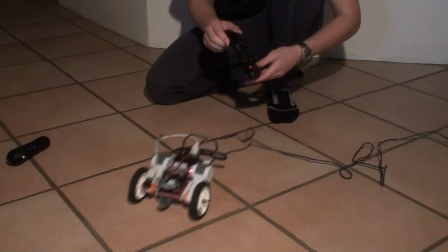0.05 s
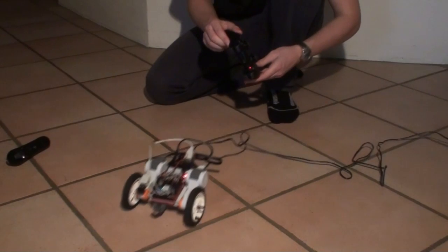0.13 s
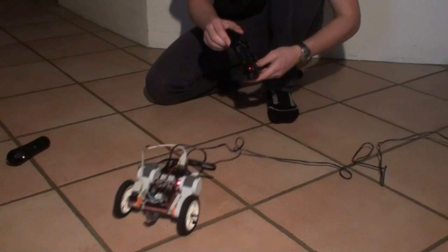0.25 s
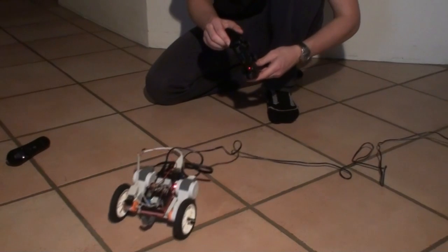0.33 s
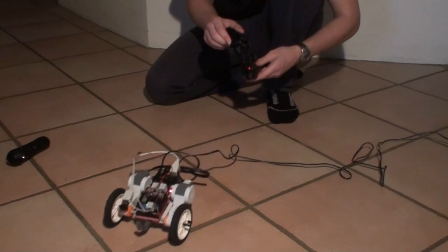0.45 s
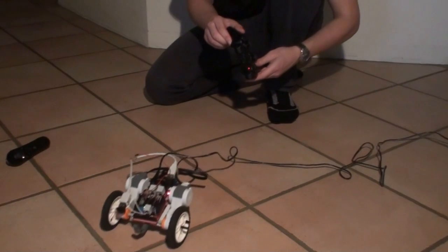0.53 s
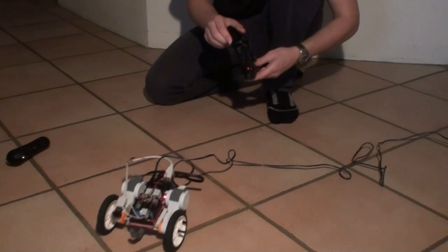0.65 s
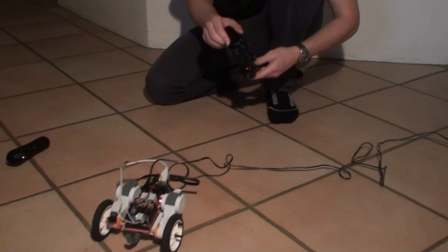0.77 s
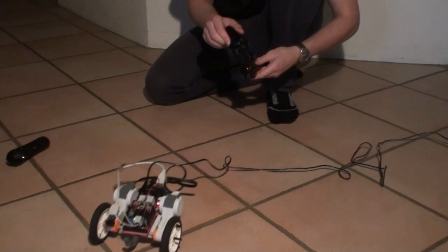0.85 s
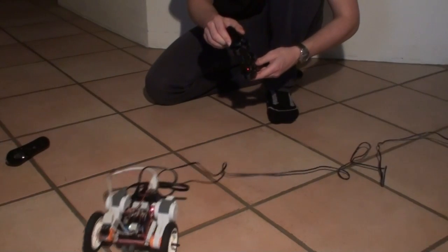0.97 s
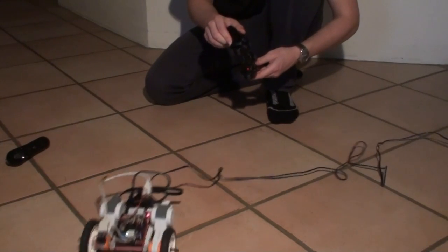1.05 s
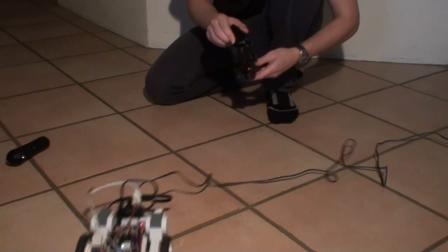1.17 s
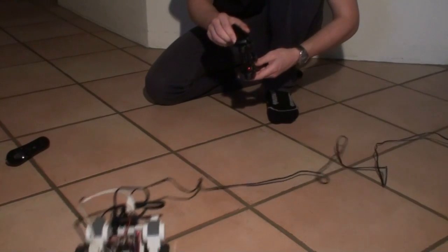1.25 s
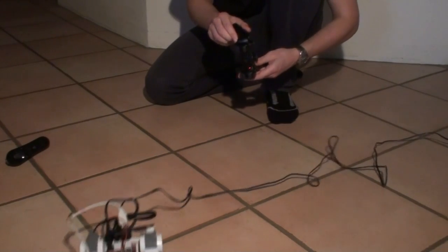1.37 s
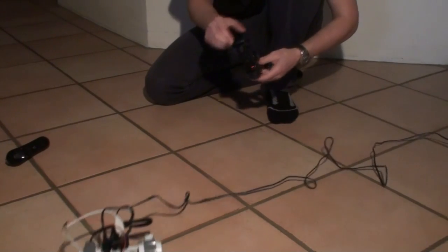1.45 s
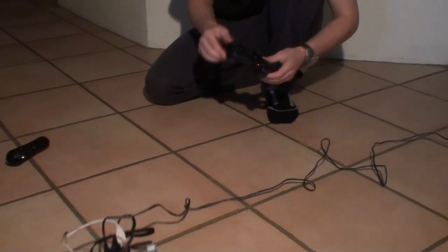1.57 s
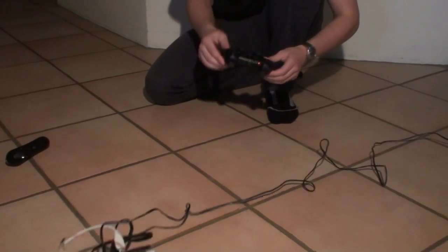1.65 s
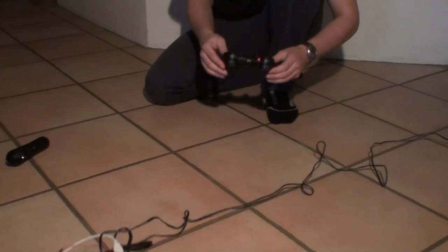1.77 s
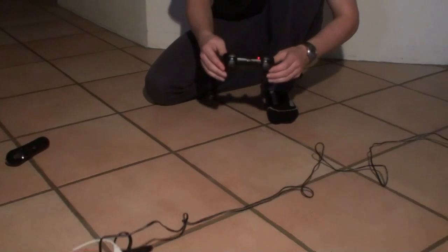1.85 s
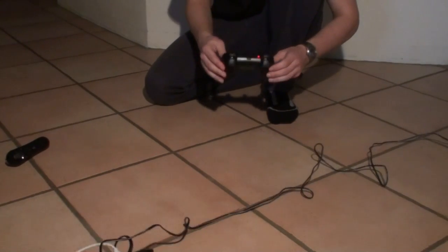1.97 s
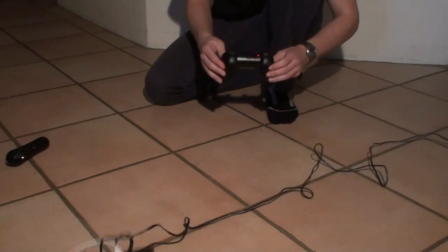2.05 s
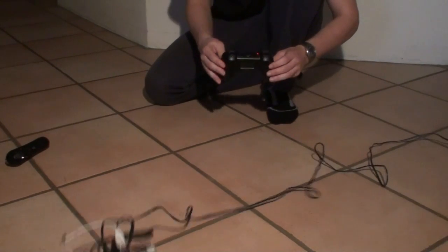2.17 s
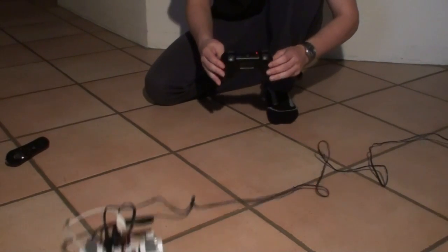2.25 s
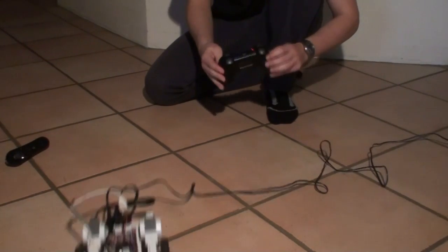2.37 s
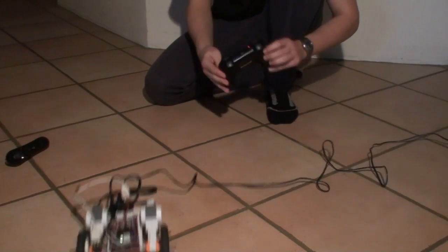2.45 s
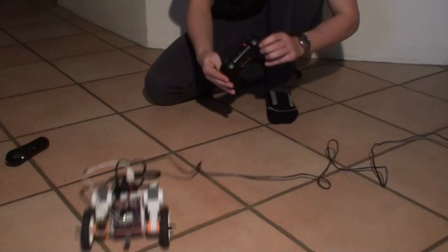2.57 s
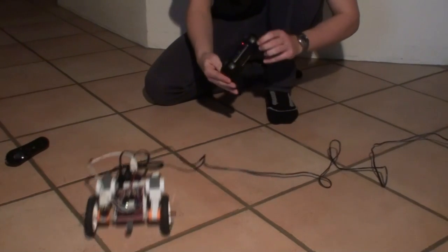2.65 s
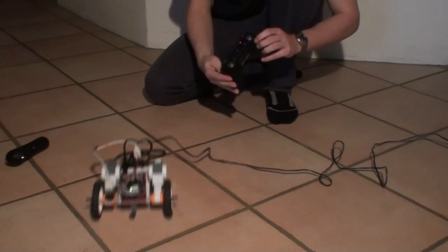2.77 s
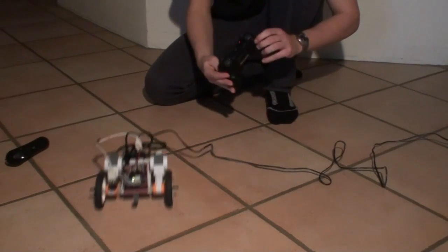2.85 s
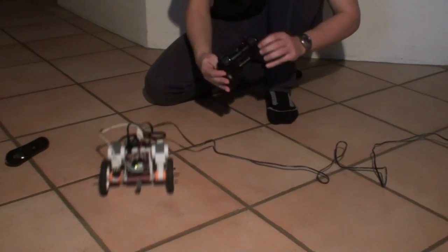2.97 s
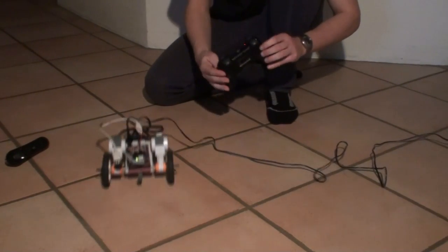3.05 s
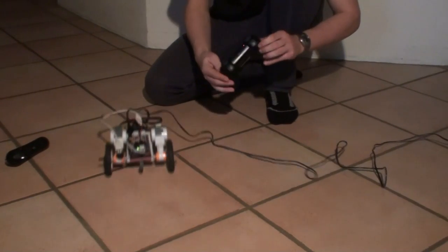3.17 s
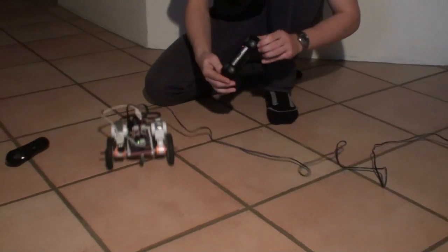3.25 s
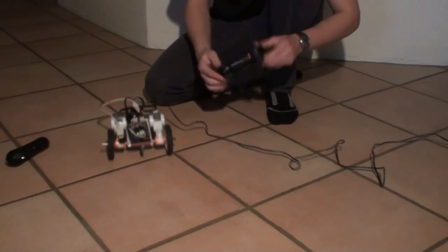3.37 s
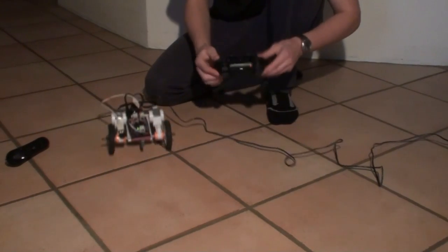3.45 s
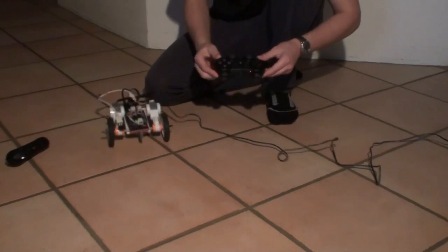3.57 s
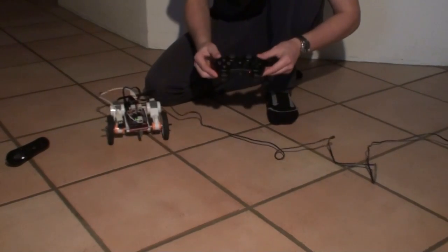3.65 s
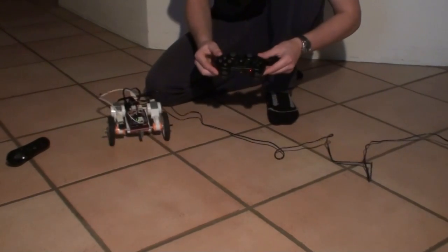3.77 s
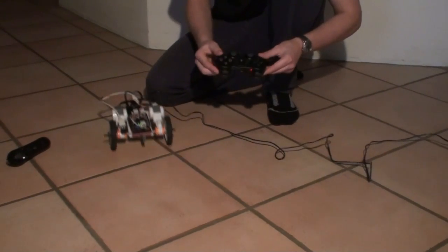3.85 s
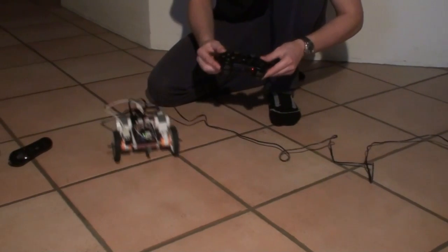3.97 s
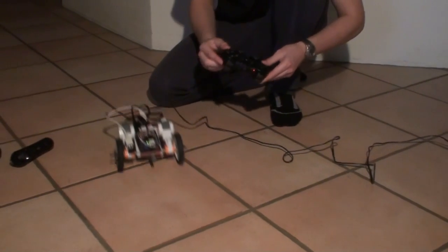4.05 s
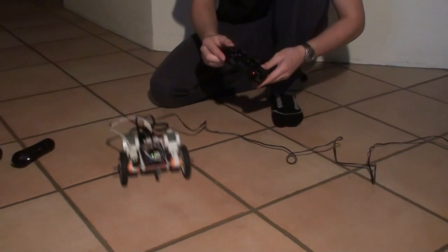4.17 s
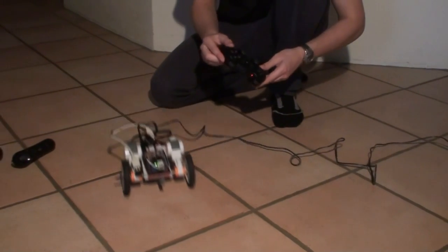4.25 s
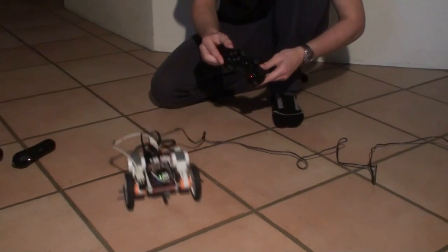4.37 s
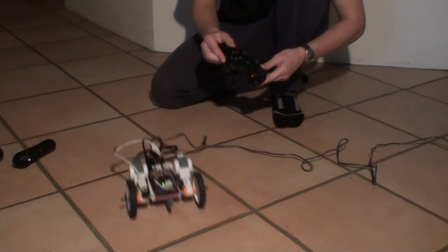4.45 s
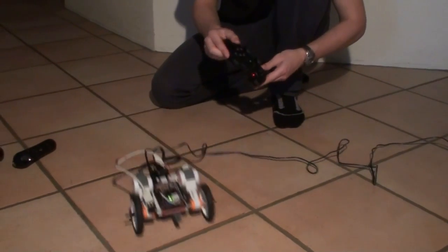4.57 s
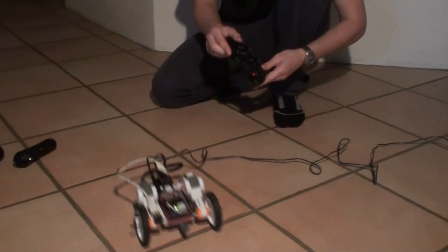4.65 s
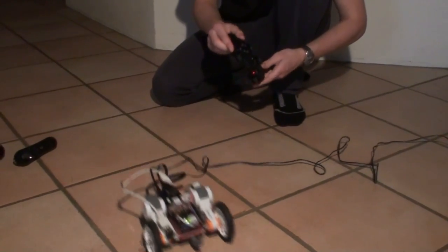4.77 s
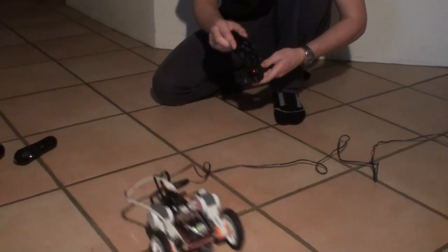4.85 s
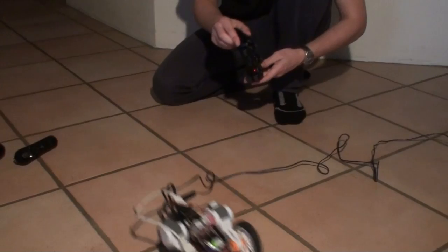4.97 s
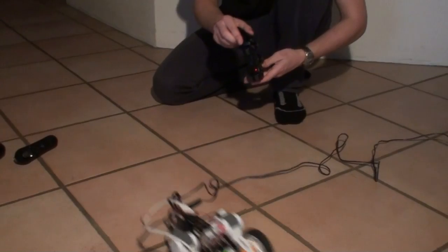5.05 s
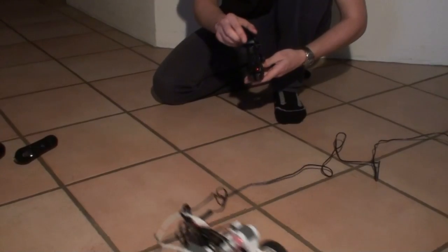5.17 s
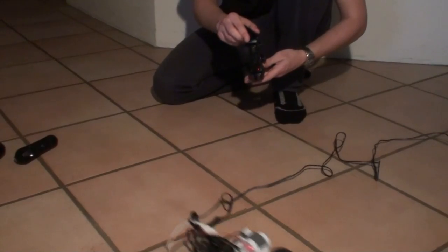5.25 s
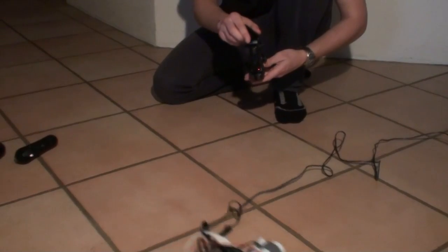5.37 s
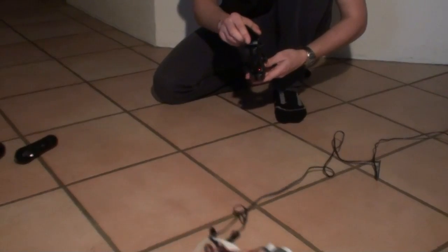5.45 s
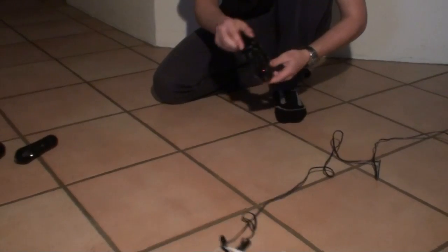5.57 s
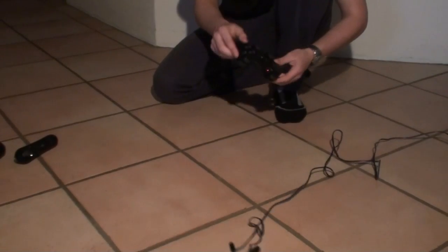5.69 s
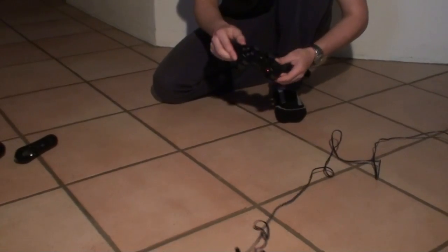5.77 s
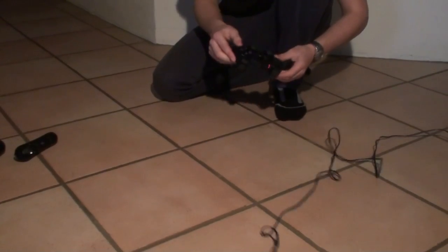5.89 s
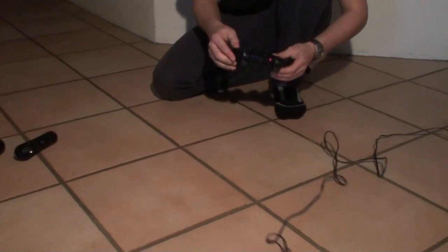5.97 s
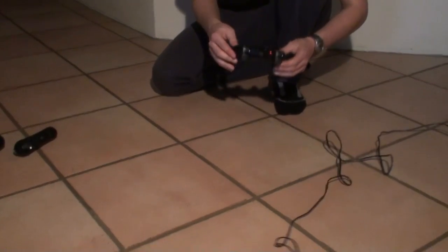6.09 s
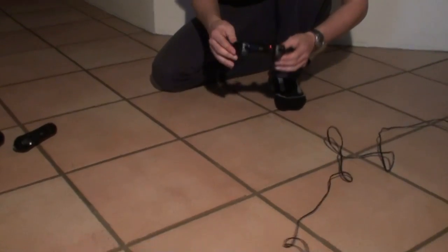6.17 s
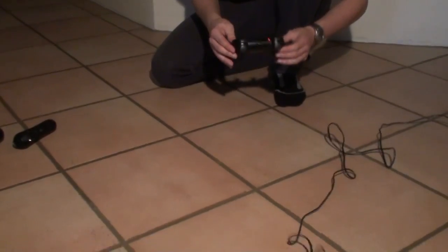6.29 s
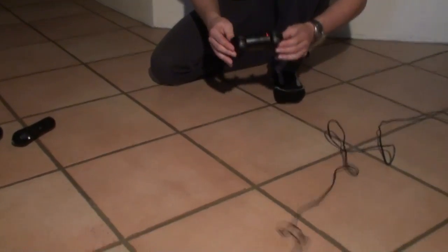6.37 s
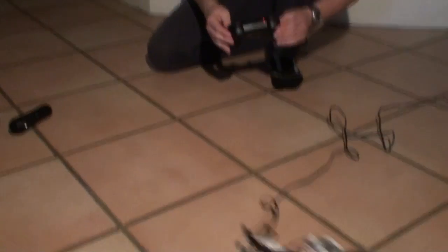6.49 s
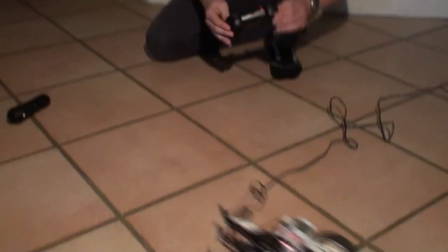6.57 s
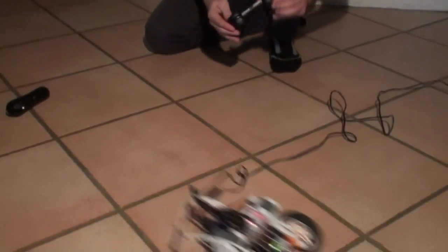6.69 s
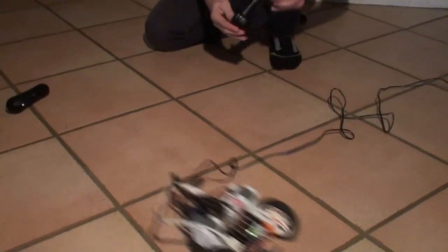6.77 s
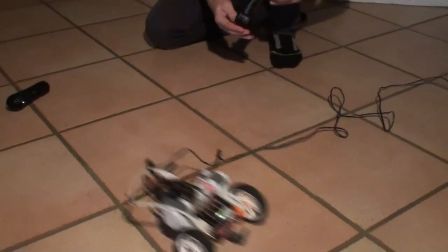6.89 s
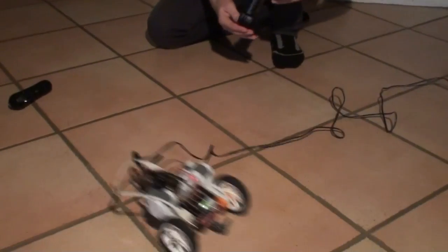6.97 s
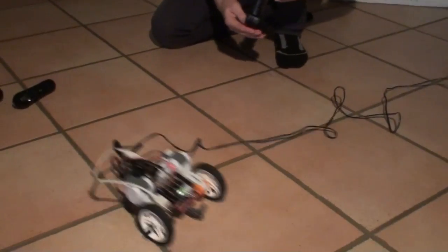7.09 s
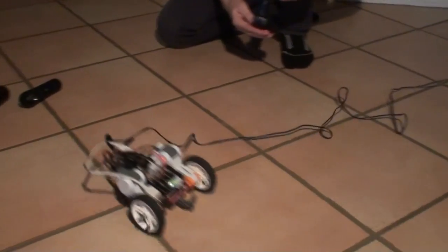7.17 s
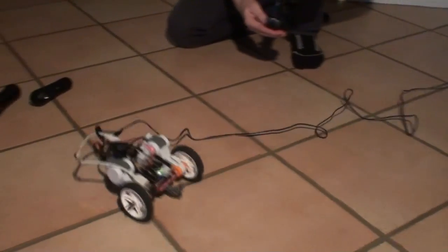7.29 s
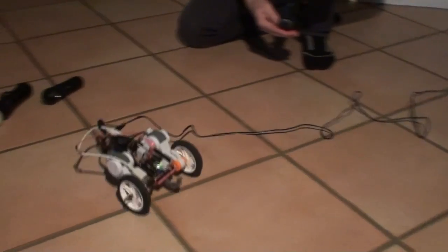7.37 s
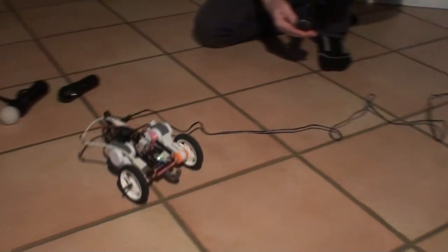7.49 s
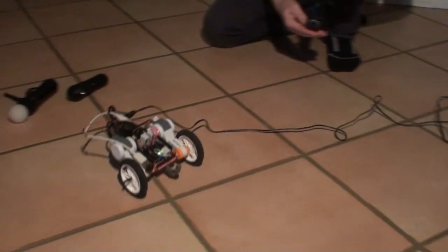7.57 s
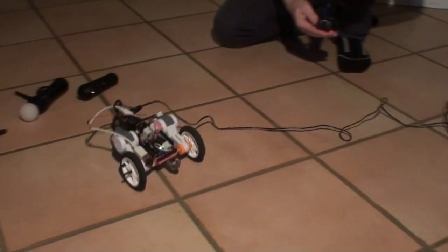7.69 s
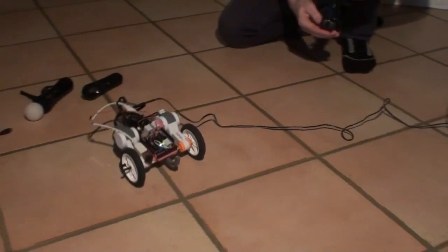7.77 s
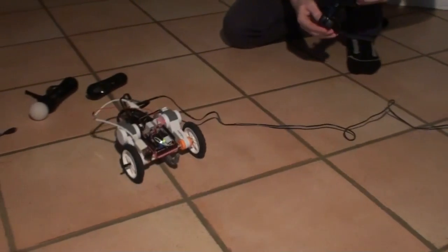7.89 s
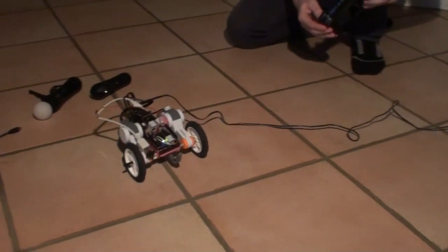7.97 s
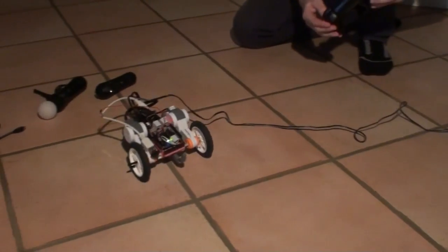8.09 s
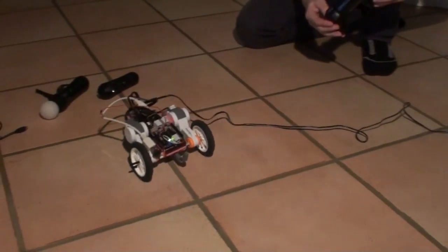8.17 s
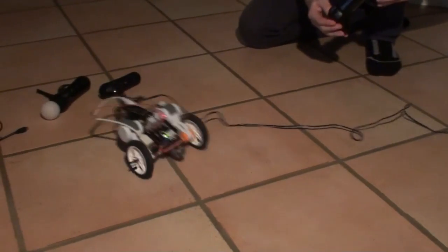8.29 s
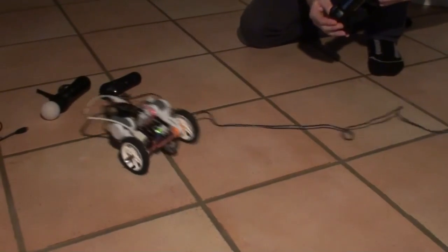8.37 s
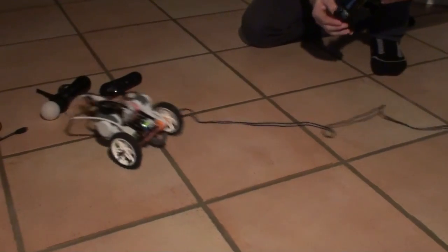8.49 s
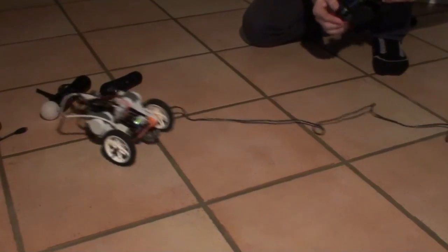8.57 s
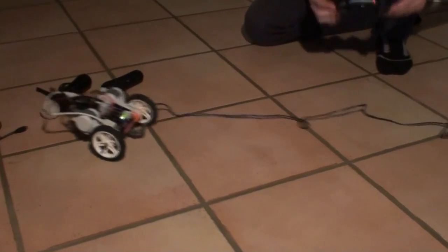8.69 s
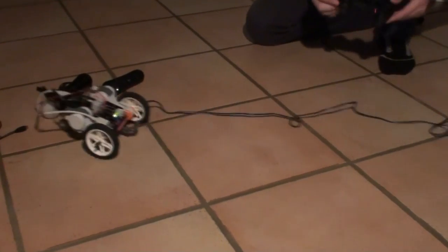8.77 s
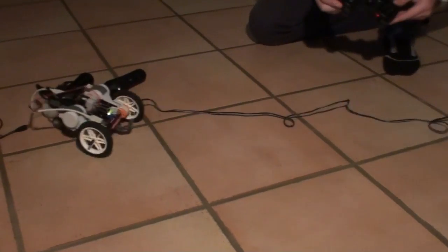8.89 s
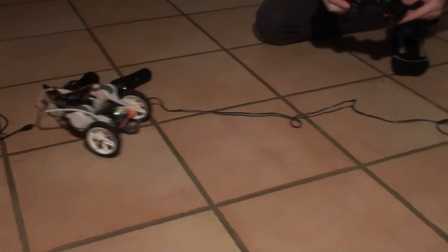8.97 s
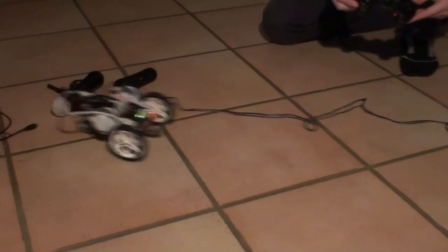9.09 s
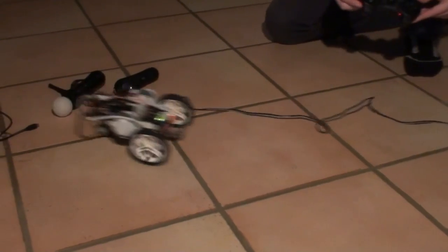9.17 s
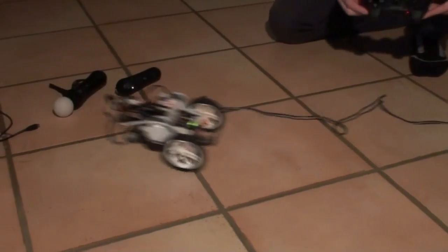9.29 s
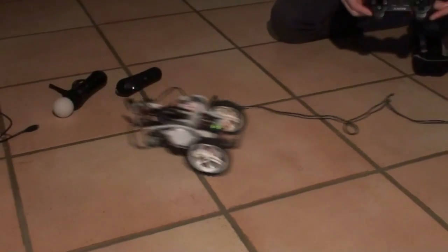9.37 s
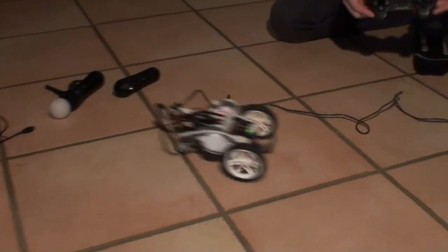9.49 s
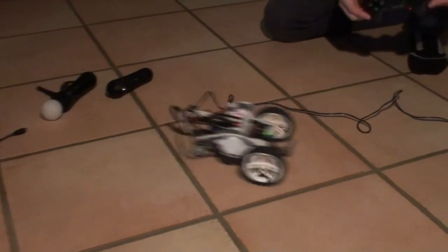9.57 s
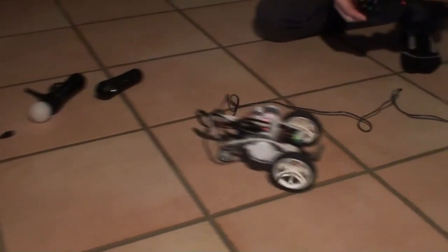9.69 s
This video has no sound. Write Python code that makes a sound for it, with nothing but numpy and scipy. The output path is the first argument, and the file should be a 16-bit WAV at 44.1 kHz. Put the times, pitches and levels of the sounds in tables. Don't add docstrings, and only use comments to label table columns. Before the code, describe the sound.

Close gear whines rise, hold and sag in bursts over rough, buzzing chatter as a little wheeled robot shuttles across indoor tiles.

```python
import sys
import numpy as np
from scipy import signal
from scipy.fft import rfft, irfft, next_fast_len
from scipy.io import wavfile
from scipy.ndimage import uniform_filter1d, map_coordinates

SR = 44100
rng = np.random.default_rng(int(sys.argv[2]) if len(sys.argv) > 2 else 0)


def put_to_file(sound):
    columns = np.atleast_2d(sound).T
    safe = np.clip(columns, -1, 1)
    whole_steps = np.round(safe * 32767)
    wavfile.write(sys.argv[1], SR, whole_steps.astype(np.int16))


def gain_from_db(level_db):
    decades = np.asarray(level_db, float) / 20
    return 10 ** decades


N = 429534
T = np.arange(N) / SR


def unit(x):
    return x / np.sqrt(np.mean(x ** 2) + 1e-20)


def along(points, hz):
    f, v = np.transpose(points)
    return np.interp(np.log(hz + 1), np.log(f + 1), v)


def curves(rows):
    s, *columns = np.transpose(rows)
    return [np.interp(T, s, column) for column in columns]


def wobble(rate):
    coarse = T[::32]
    knots = rng.standard_normal(int(N * rate / SR) + 4)
    return np.interp(T, coarse, map_coordinates(knots, [coarse * rate]))


def gate(a, b):
    return np.clip(np.minimum(T - a, b - T) / 0.0062, 0, 1)


def filtered(x, response):
    m = next_fast_len(N + SR // 8)
    return irfft(rfft(x, m) * response(np.fft.rfftfreq(m, 1 / SR)), m)[..., :N]


def resonances(modes):
    def shape(f, centre, width):
        return (1 + ((centre * centre - f * f) / (f * width + 1)) ** 2) ** -1.5

    def damped(f):
        return 1 + (f / 12100) ** 20

    return lambda f: np.sqrt(sum(gain_from_db(2 * db) * shape(f, c, w) for c, w, db in modes) / damped(f))


# frequency in Hz, left-right correlation from 0 to 1.
LIKENESS = [(60, 0.11), (130, 0.078), (290, 0.45), (640, 0.38), (1410, 0.48), (3100, 0.59), (6820, 0.39),
            (15000, 0.58)]


def pair(patchy_db):
    hz, _, z = signal.stft(rng.standard_normal((2, N)), SR, nperseg=512)
    patches = rng.standard_normal(z.shape[1:])
    patches = uniform_filter1d(uniform_filter1d(patches, 2, 0), 40, 1)
    turn = np.arccos(np.clip(along(LIKENESS, hz), -1, 1))[:, None] / 2
    mid, side = z[0] * np.cos(turn), z[1] * np.sin(turn)
    both = np.array([mid + side, mid - side]) * gain_from_db(patchy_db * unit(patches))
    return signal.istft(both, nperseg=512)[1][:, :N]


# time in seconds, share seen from behind (0 to 1).
FACING = [(0, 0), (2.08, 0.15), (2.12, 0.98), (3.8, 0.86), (3.84, 0.01), (5.3, 0), (5.36, 0.04),
          (6.33, 0.4), (6.37, 0.95), (9.02, 0.99), (9.06, 0.2)]
# frequency in Hz, width in Hz, level in dB.
SHELL_FRONT = [(950, 300, -11), (1350, 450, -9), (1650, 400, -4), (2020, 450, 0), (2800, 360, 2),
               (3250, 400, -8), (4120, 450, 5)]
# frequency in Hz, width in Hz, level in dB.
SHELL_BACK = [(950, 300, -13), (1600, 450, -7), (1980, 420, -1.5), (2550, 400, -8), (3000, 370, 5),
              (4140, 260, 6)]


def shell(hz):
    step = slice(None, None, 64)
    back = np.clip(curves(FACING)[0][step], 0, 1)
    front_gain, back_gain = resonances(SHELL_FRONT)(hz[step]), resonances(SHELL_BACK)(hz[step])
    return np.interp(T, T[step], (1 - back) * front_gain + back * back_gain)


def whine(bursts, multiples, jitter_hz, flutter_db):
    mesh_hz, level_db = curves(np.concatenate(bursts))
    hz_per_s = uniform_filter1d(np.gradient(mesh_hz), size=1500) * SR
    push = np.tanh(hz_per_s / 1400)
    phase = 2 * np.pi * np.cumsum(mesh_hz + jitter_hz * wobble(60)) / SR
    running = sum(gate(burst[0][0], burst[-1][0]) for burst in bursts)
    tone = 0
    for k, (_, db, push_db) in enumerate(multiples, start=1):
        gain_db = db + push_db * push + flutter_db * wobble(35) + 1.2 * wobble(8)
        tone = tone + gain_from_db(gain_db) * shell(k * mesh_hz) * np.sin(k * phase)
    return gain_from_db(level_db + 3.0) * running * tone, phase


# time in seconds, mesh rate in Hz, whine in dB.
FORWARD = [
    [(.92, 460, -42), (.99, 685, -43), (1.055, 700, -42), (1.15, 900, -43), (1.2, 932, -42),
     (1.39, 930, -41), (1.47, 765, -43), (1.66, 475, -46)],
    [(1.7, 485, -50), (1.75, 512, -41), (1.81, 495, -47)],
    [(3.86, 705, -55), (3.958, 916, -45), (4.03, 985, -50)],
    [(4.53, 906, -46), (4.57, 965, -46), (4.696, 1047, -44), (4.92, 1025, -44), (5.03, 1015, -37),
     (5.102, 1008, -45), (5.22, 914, -45), (5.47, 603, -43), (5.53, 590, -48)],
    [(5.855, 600, -41), (5.9, 785, -38), (5.95, 890, -40), (6.0, 950, -40), (6.05, 945, -38),
     (6.1, 880, -44), (6.24, 590, -41)],
    [(9.07, 500, -52), (9.2, 780, -52)],
]
# time in seconds, mesh rate in Hz, whine in dB.
BACKWARD = [
    [(2.14, 510, -40), (2.205, 730, -38), (2.265, 915, -37), (2.32, 920, -47)],
    [(2.38, 1056, -40), (2.436, 1040, -40), (2.52, 1050, -46), (2.882, 1029, -41), (3.248, 1020, -43),
     (3.454, 1000, -42), (3.62, 991, -39), (3.73, 970, -58)],
    [(6.375, 470, -42), (6.45, 750, -38), (6.48, 870, -36), (6.51, 900, -46)],
    [(6.57, 1040, -40), (6.618, 1024, -34), (6.68, 1020, -52), (6.744, 1069, -40), (7.306, 1023, -37),
     (7.368, 965, -38), (7.466, 778, -40)],
    [(8.29, 570, -48), (8.36, 740, -40), (8.46, 925, -42), (8.55, 965, -40), (8.68, 1000, -39),
     (8.78, 945, -42), (8.86, 730, -45), (8.92, 640, -46)],
]
# multiple, level in dB, dB gained speeding up and lost slowing down.
MULTIPLES_A = [(1, -10, 0), (2, 0, 0), (3, 1.5, 3.5), (4, -3.5, 1.5), (5, -10, 3), (6, -10, 3)]


def first_motor():
    tone, phase = whine(sorted(FORWARD + BACKWARD), MULTIPLES_A, jitter_hz=6, flutter_db=3.5)
    return gain_from_db(-0.95) * tone, phase


# time in seconds, mesh rate in Hz, whine in dB.
MOTOR_B = [
    [(1.4, 948, -42), (1.55, 987, -46), (1.71, 862, -43)],
    [(2.42, 946, -43.5), (3.65, 919, -62)],
    [(4.7, 964, -64), (5.25, 911, -44)],
    [(5.57, 953, -43), (5.7, 740, -55), (5.82, 606, -54)],
    [(6.02, 955, -48), (6.08, 1047, -46), (6.17, 1053, -45)],
    [(6.7, 900, -41.5), (7.2, 879.6, -51)],
    [(7.42, 930, -44), (7.6, 994, -48), (7.76, 977, -67)],
    [(8.8, 1004, -39.5), (8.97, 980, -55)],
]
# multiple, level in dB, dB gained speeding up and lost slowing down.
MULTIPLES_B = [(1, -10.5, -1), (2, -5, -5), (3, 2.5, 5), (4, -0.5, 1.5)]


def second_motor():
    return whine(MOTOR_B, MULTIPLES_B, jitter_hz=6.1, flutter_db=4.5)[0]


# start in seconds, end in seconds, level in dB.
FIFTH = [
    (7.135, 7.225, -41),
]
# start in seconds, end in seconds, frequency in Hz, level in dB.
IDLERS = [
    (1.22, 1.36, 4960, -46),
    (4.72, 5.05, 5480, -46),
    (1.0, 1.2, 4180, -48),
    (7.75, 8.0, 4250, -58),
    (7.78, 8.0, 4480, -60),
    (4.2, 4.6, 6620, -44),
    (4.86, 5.1, 1730, -54),
    (5.3, 5.8, 5200, -53),
    (.98, 1.5, 7800, -47),
]


def squeal(phase):
    fifth = np.sin(5 * phase) * sum(gain_from_db(db + 13.0) * gate(a, b) for a, b, db in FIFTH)
    drift, flutter = np.cumsum(40 * wobble(60)) / SR, gain_from_db(2.3 * wobble(30))
    idlers = sum(gain_from_db(db + 5.0) * gate(a, b) * np.sin(2 * np.pi * (hz * T + drift)) for a, b, hz, db in IDLERS)
    return fifth + flutter * idlers


# start of full effort in seconds, end in seconds, effort in dB at the start,
# effort in dB at the end, pinion share in dB.
DRIVES = [(0, 0.377, -30, -34, -11.5), (0.384, 0.705, -33.5, -47, -11), (0.742, 0.896, -39.5, -43, -27),
          (0.913, .95, -38, -34, -18), (0.983, 1.41, -30, -26, -13), (1.41, 1.83, -27, -35, -10.5),
          (1.87, 1.956, -37.5, -39, -8), (2.179, 2.273, -31, -25.5, -4), (2.318, 2.383, -28, -28, -10),
          (2.398, 3.628, -26.5, -28.5, -5.5), (3.886, 4.298, -27, -27.5, -13.5),
          (4.301, 4.54, -26.5, -31, -11.5), (4.577, 4.699, -27, -28, -13), (4.713, 5.243, -27, -26.5, -7.5),
          (5.273, 5.841, -29.5, -35, -7.5), (5.897, 6.164, -26, -26, -8), (6.423, 6.485, -26, -23.5, -7),
          (6.574, 6.702, -24, -26.5, -4.5), (6.738, 7.269, -25, -26.5, -3), (7.276, 7.601, -28, -32.5, 0),
          (7.603, 8.0, -30.5, -45.5, -4.5), (8.34, 8.63, -31, -29.5, 1), (8.63, 8.902, -28.5, -31.5, 1),
          (9.117, 9.74, -28.5, -24.5, -12.5)]


def effort():
    t = T[::64]
    a, b, first, last, share = np.transpose(DRIVES)[:, :, None]
    each = first + (last - first) * np.clip((t - a) / (b - a), 0, 1)
    rise_db_per_s, fall_db_per_s = 281, 105
    each = each - rise_db_per_s * np.clip(a - t, 0, None) - fall_db_per_s * np.clip(t - b, 0, None)
    db, share = each.max(0), uniform_filter1d(share[each.argmax(0), 0], size=30)
    keep = np.exp(-t[1] / 0.033)
    lagging = signal.lfilter([1 - keep], [1, -keep], db - db[0])
    strain = np.clip(db - db[0] - lagging, 0, None)
    back = np.interp(t, *np.transpose(FACING))
    usual_db = -29

    def law(over, grows, strained, behind):
        return usual_db + over + grows * (db - usual_db) + strained * strain + behind * back

    casing = law(over=-8.5, grows=0.42, strained=0.3039, behind=-1.34)
    pinion = law(over=0.1, grows=1.43, strained=0.027, behind=0.1) + share
    brush = law(over=-17.5, grows=0.8, strained=-1.13, behind=-4.5)
    return [np.interp(T, t, level) for level in (casing, db, pinion, brush)]


# frequency in Hz, width in Hz, level in dB.
CASING = [(1437, 660, -2), (1806, 550, 2), (2380, 510, 2.5), (2932, 710, 1.5)]
# frequency in Hz, width in Hz, level in dB.
TRAIN_FRONT = [(3915, 890, -1.5), (4040, 410, -4.5), (5220, 1260, -2.5), (6380, 1400, 0.5),
               (7860, 1930, -4)]
# frequency in Hz, width in Hz, level in dB.
TRAIN_BACK = [(3715, 1100, -1.5), (4175, 360, -2.5), (4910, 810, -4.5), (6240, 1840, -3), (7900, 1680, -6)]
# frequency in Hz, width in Hz, level in dB.
PINION_FRONT = [(10120, 540, -4), (11030, 1700, -3.5)]
# frequency in Hz, width in Hz, level in dB.
PINION_BACK = [(10600, 260, -6), (10490, 1130, 5), (11600, 230, -14.5)]
# frequency in Hz, density in dB per Hz.
BRUSH = [(9000, -13.5), (11000, -32), (12000, -5.5), (13500, -4), (15000, -5), (15600, -16)]
# frequency in Hz, width in Hz, level in dB.
GROAN_MODES = [(1800, 280, -10), (2840, 260, 1.5)]
# start in seconds, end in seconds, level in dB.
GROANS = [
    (2.135, 2.29, -31),
    (2.39, 2.47, -36),
    (6.38, 6.5, -38),
    (6.57, 6.64, -33),
    (8.26, 8.33, -47),
    (8.33, 8.45, -41),
]


def chatter(phase):
    shaft, gear = phase / 6, phase / 30
    beat = (1 + 0.037 * np.cos(shaft)) * (1 + 0.018 * np.cos(gear))
    teeth = beat * gain_from_db(0.54 * wobble(25) + 0.16 * wobble(400)) * pair(patchy_db=1.9)
    modes = CASING, TRAIN_FRONT, TRAIN_BACK, PINION_FRONT, PINION_BACK, GROAN_MODES
    shapes = [resonances(m) for m in modes] + [lambda hz: gain_from_db(along(BRUSH, hz))]
    rung = filtered(teeth, lambda hz: np.array([shape(hz) for shape in shapes])[:, None])
    casing, train, train_back, pinion, pinion_back, groan, brush = map(unit, rung)
    back = np.clip(curves(FACING)[0], 0, 1)
    train = train + back * (train_back - train)
    pinion = pinion + back * (pinion_back - pinion)
    parts = sum(gain_from_db(db - 2.5) * part for db, part in zip(effort(), (casing, train, pinion, brush)))
    return parts + groan * sum(gain_from_db(db) * gate(a, b) for a, b, db in GROANS)


# frequency in Hz, level in dB.
WHISTLE = (9991, -63)


def whistle():
    hz, db = WHISTLE
    return gain_from_db(db + 6 + 1.6 * wobble(21)) * np.sin(2 * np.pi * hz * T)


# time in seconds, thud in dB, frame mode in Hz, frame knock in dB.
BUMPS = [
    (6.594, -44, 732, -33),
    (9.622, -61, 1360, -27),
]


def bumps():
    out, t = np.zeros(N + SR), np.arange(SR // 8) / SR
    for s, thud_db, hz, frame_db in BUMPS:
        thud = gain_from_db(thud_db - 60 * t / 0.028) * np.sin(2 * np.pi * 110 * t)
        rattle = 0.24 * rng.standard_normal(len(t))
        knock = gain_from_db(frame_db - 60 * t / 0.025) * (np.sin(2 * np.pi * hz * t) + rattle)
        out[round(s * SR):][:len(t)] += thud + knock
    return out[:N]


# frequency in Hz, decay time by 60 dB in seconds.
WALLS = [(300, 0.66), (3000, 0.56), (12000, 0.076)]


def walls(x):
    hz, t, z = signal.stft(rng.standard_normal((2, SR // 2)), SR, nperseg=256)
    tail = signal.istft(z * gain_from_db(-60 * t / along(WALLS, hz)[:, None]), SR, nperseg=256)[1]
    delayed = np.pad(x, (300, 0))[None]
    return signal.fftconvolve(delayed, tail / np.linalg.norm(tail[0]), axes=1)[:, :N]


# frequency in Hz, density in dB per Hz.
ROOM_TONE = [(12, -35), (20, -11), (453, -3.5), (582, -2.5), (633, -2.5), (748, 1.5), (1050, -3),
             (8450, -22), (9710, -10), (10900, -24), (15600, -20)]
# frequency in Hz, width in Hz, level in dB.
HUM = [(69, 8.7, -75.5), (217, 5.8, -75.5)]


def room_tone():
    hiss = gain_from_db(-52) * unit(filtered(pair(patchy_db=2.4), lambda hz: gain_from_db(along(ROOM_TONE, hz))))
    noise = rng.standard_normal(N)
    hums = sum(gain_from_db(db) * unit(filtered(noise, resonances([(hz, width, 0)]))) for hz, width, db in HUM)
    return hiss + hums


# time in seconds, left minus right in dB.
PAN = [(0.0, -6.5), (1.84, -6), (2.01, -5), (3.72, -6.5), (5.18, -6.5), (7.24, -5.5), (7.81, -6),
       (8.54, -5), (9.22, -5.5), (9.74, -6.5)]


def scene():
    tone, phase = first_motor()
    robot = tone + second_motor() + squeal(phase) + whistle() + bumps()
    side = gain_from_db((curves(PAN)[0] + 2) * np.array([[.5], [-.5]]))
    return side * (robot + gain_from_db(-5.5) * walls(robot) + chatter(phase)) + room_tone()


def roll_off(x):
    return signal.sosfilt(signal.butter(12, 16090, fs=SR, output="sos"), x)


# frequency in Hz, left minus right in dB.
PORTS = [(60, -9), (120, -5.5), (300, 2), (1000, -1.5), (3200, 0.5), (6000, -2.5), (8500, -1), (11000, 2.5),
         (11800, -5.5), (13400, -106), (15500, -55)]
# frequency in Hz, gain in dB.
MIC = [(400, 0.5), (11500, 0.5), (12500, -3.5), (15000, 0.5), (15600, -12)]


def record(dry):
    def response(hz):
        left = 2 / (1 + gain_from_db(-along(PORTS, hz)))
        return (hz < 15600) * gain_from_db(along(MIC, hz)) * np.array([left, 2 - left])

    return roll_off(filtered(dry, response))


dry = scene()
out = record(dry)
put_to_file(out)
```